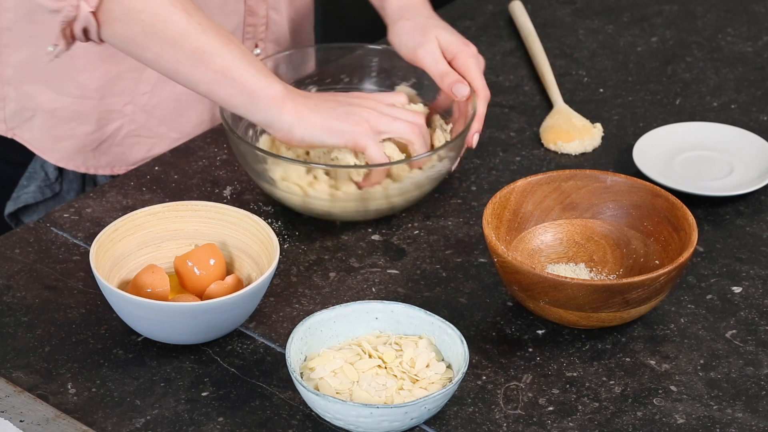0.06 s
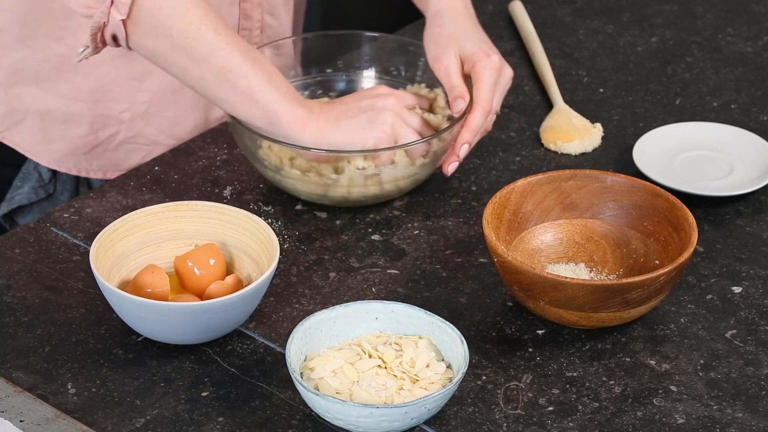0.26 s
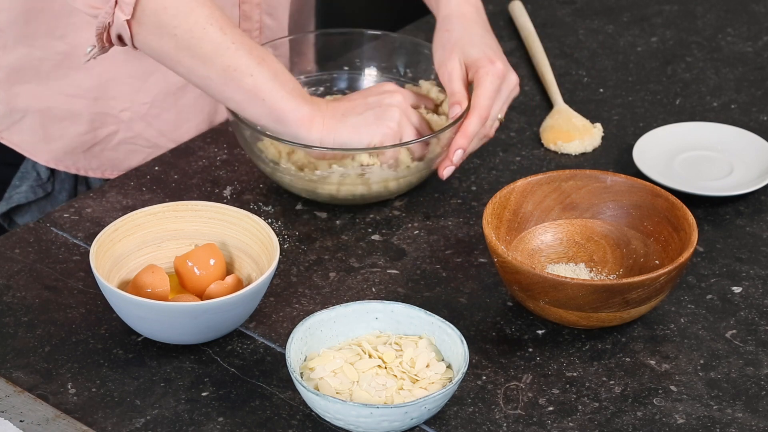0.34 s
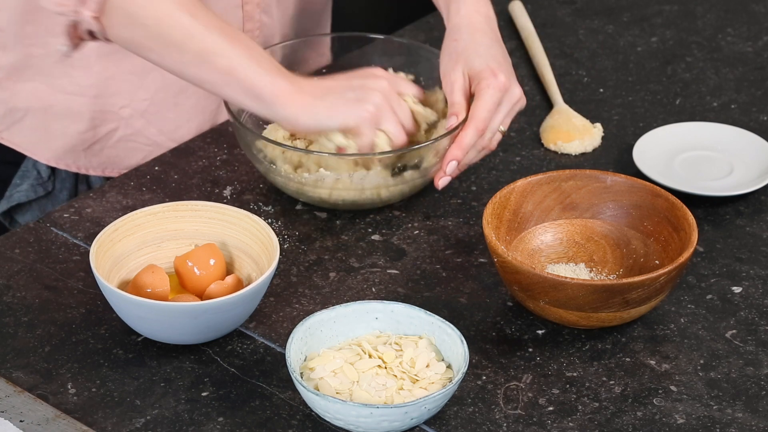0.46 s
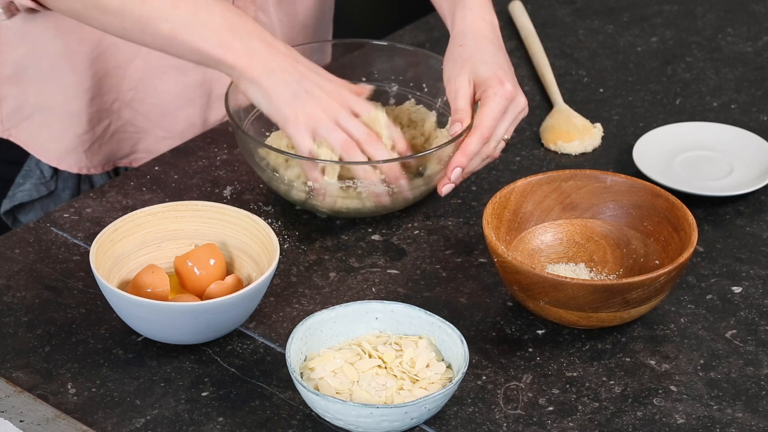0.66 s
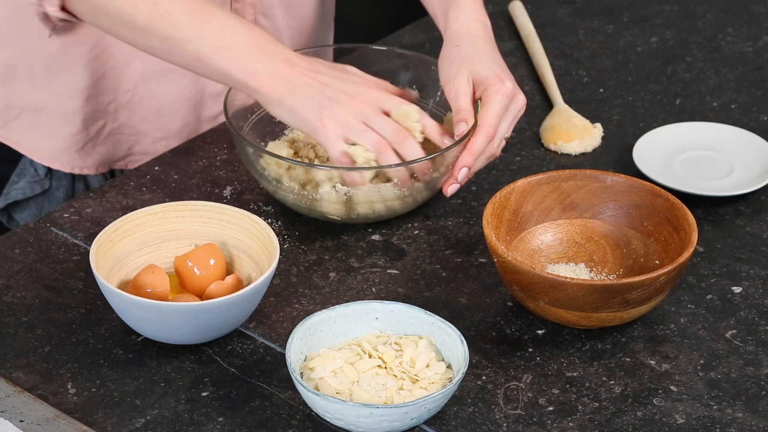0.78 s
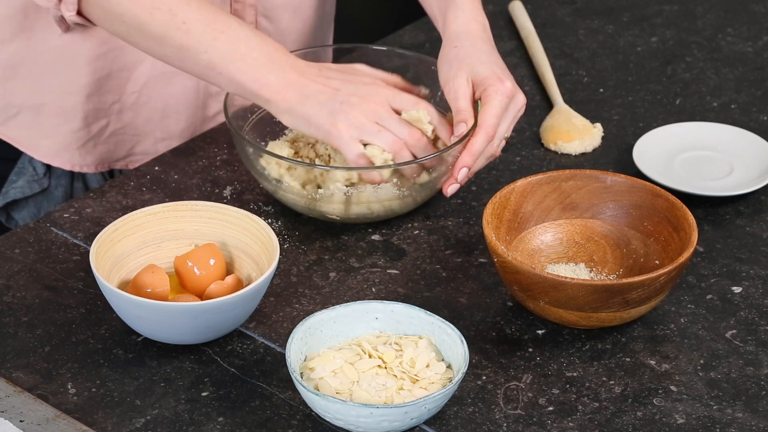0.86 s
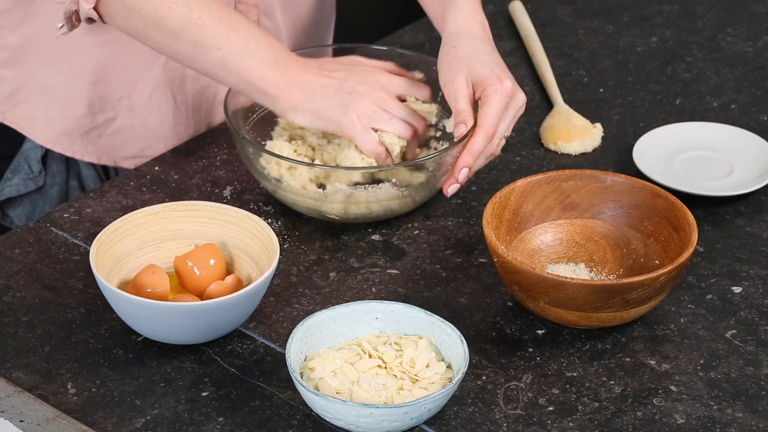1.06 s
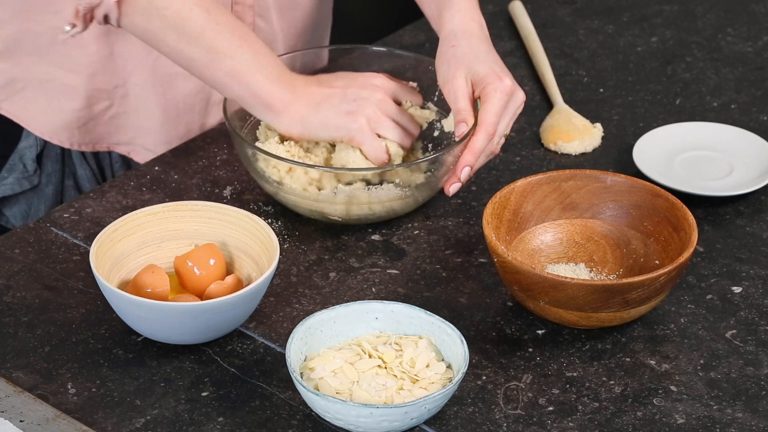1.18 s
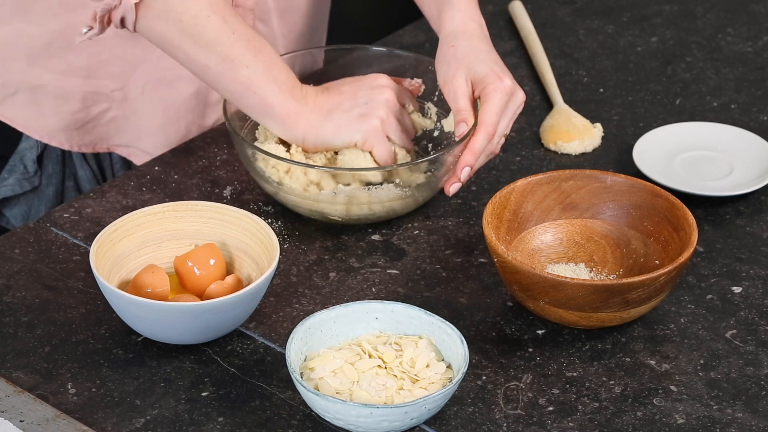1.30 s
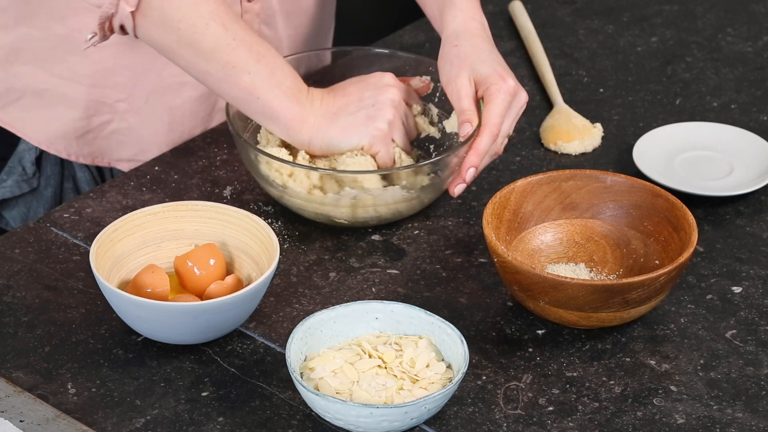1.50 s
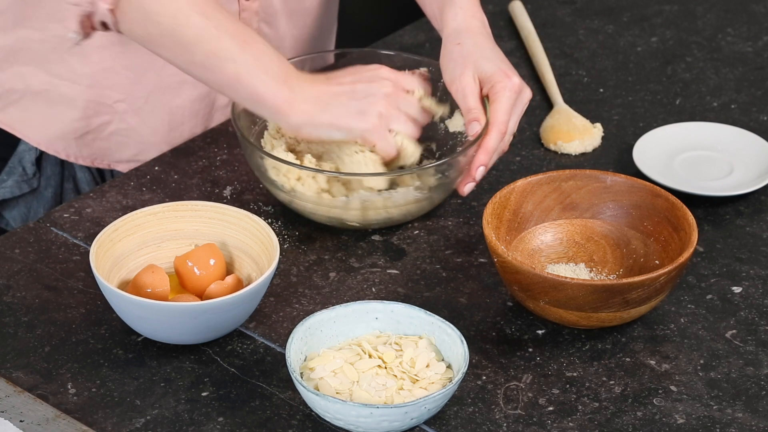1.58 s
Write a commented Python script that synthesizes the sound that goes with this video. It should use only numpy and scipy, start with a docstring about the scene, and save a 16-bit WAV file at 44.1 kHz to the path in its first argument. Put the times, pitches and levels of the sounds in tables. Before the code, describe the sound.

A glass bowl of dough scrapes on a stone counter, starting near 0.1 s: hollow, stuttering rubs with gritty glass and dry crumb rustle until about 0.75 s. A hard, clattering knock lands at 0.79 s, then a short scrape from 0.87 s and lighter knocks at 0.94, 1.06 and 1.13 s. Near quiet with faint rustles follows; scraping resumes around 1.6 s. Short kitchen echo, low hum, soft room noise.

```python
"""A low mains hum, then a glass bowl of dough scrapes and judders on a stone counter in a kitchen as hands knead.
Random slips excite the counter and the hollow under the foot, grit sets the glass singing, crumbs rustle.
The bowl tips, knocks down hard and rocks a few times: clicks ring counter and glass, and landings, from
hard slams to faint taps, are sines soon choked. Decaying noise gives the kitchen's echoes; room noise and
a low rumble lie below."""
import sys
import numpy as np
from scipy import signal
from scipy.fft import rfft, irfft
from scipy.io import wavfile

SR = 44100
rng = np.random.default_rng(int(sys.argv[2]) if len(sys.argv) > 2 else 0)


def store_pcm(level_fs):
    """Save levels as 16-bit WAV."""
    pcm = np.round(np.clip(level_fs, -1, 1) * 32767).astype(np.int16)
    wavfile.write(sys.argv[1], SR, np.atleast_2d(pcm).T)


def makeup_ratio(level_db):
    """Linear amplitude ratio for a level in decibels (20 dB per factor of ten)."""
    decades = np.asarray(level_db, float) / 20
    return 10 ** decades


N = 72765   # samples, 1.65 s

# modes of the bowl, damped by dough and hands; both levels are relative, before a weight by width:
# pitch_hz, width_hz, scraped_db, struck_db
GLASS_MODES = [(2406, 110, -31, 1), (2650, 28, -35, -11), (3047, 80, -24, -10), (3475, 60, -20, -5),
               (4610, 29, -28, -16), (5194, 14, -35, -14), (5510, 83, -3, -3), (5784, 160, -0.5, -1.5),
               (5860, 130, -9, -7), (7094, 110, -11.5, -14), (7240, 43, -7, -26), (7740, 72, -5, 2),
               (8540, 124, -7.5, -7), (8080, 40, -4.5, -17), (9520, 300, -13, -13.5),
               (10570, 130, -11, -10.5), (12200, 190, -12, -12), (14120, 260, -17, -13),
               (15050, 100, -22.5, -32)]


def rms_one(x):
    """Scales x to rms 1."""
    return x / np.sqrt(np.mean(x ** 2) + 1e-20)


def in_time(tables):
    """Joins tables that start with a time in s and draws straight lines between their rows."""
    s, *columns = np.transpose(np.concatenate(tables))
    return [np.interp(np.arange(N) / SR, s, column) for column in columns]


def drift(rate_hz):
    """Slow random wander of rms 1, from noise through a double low-pass."""
    r = np.exp(-2 * np.pi * rate_hz / SR)
    noise = rng.standard_normal(N + SR)
    return rms_one(signal.lfilter([1], [1, -2 * r, r * r], noise)[SR:])   # drops the filter's first second


def grains(per_s, spread_db):
    """Random clicks of uneven size and either sign; rms 1."""
    sizes = makeup_ratio(spread_db * np.minimum(rng.exponential(1, N), 5)) * rng.choice([-1, 1], N)
    return rms_one(sizes * (rng.random(N) < per_s / SR))


def band(x, order, edges_hz):
    """Butterworth band-pass between two edges."""
    return signal.sosfilt(signal.butter(order, edges_hz, "band", fs=SR, output="sos"), x)


def poles(hz, width_hz):
    """Filter coefficients of one resonance; a wider one is damped faster."""
    r = np.exp(-np.pi * width_hz / SR)
    return (1 - r * r) / 2 * np.array([1, 0, -1]), [1, -2 * r * np.cos(2 * np.pi * hz / SR), r * r]


def resonance(x, hz, width_hz):
    """Two passes at one pitch, the first wider, leave dark valleys beside the peak; rms 1."""
    first = signal.lfilter(*poles(hz, 1.9 * width_hz), x)
    return rms_one(signal.lfilter(*poles(hz, width_hz), first))


def moving_resonance(x, hz, width_hz):
    """Two passes through a resonance whose pitch and width move, the second twice as wide; rms 1."""
    step = 128   # samples between coefficient updates
    for widen in (1, 2):
        state, moved = np.zeros(2), np.zeros(N)
        for i in range(0, N, step):
            coefficients = poles(hz[i], widen * width_hz[i])
            moved[i:i + step], state = signal.lfilter(*coefficients, x[i:i + step], zi=state)
        x = moved / width_hz ** .25   # offsets part of the gain of wide settings on noise
    return rms_one(x)


def ring(clicks, hz, t60_s):
    """A unit click sets a decaying sine ringing from height 1."""
    r, w = makeup_ratio(-60 / (t60_s * SR)), 2 * np.pi * hz / SR
    return signal.lfilter([0, np.sin(w)], [1, -2 * r * np.cos(w), r * r], clicks + 1e-18)


def counter_thrum():
    """Slips of the foot drive fixed counter modes and one main mode that moves as the weight shifts."""
    # counter modes under the foot, level against the main thrum: pitch_hz, width_hz, level_db
    counter_modes = [(602, 267, -7), (384, 225, -19), (1080, 33, -9.5), (1520, 50, -16.5),
                     (1850, 18, -38.5)]
    # weight shifting on the foot: time_s, main_thrum_hz, hollow_width_hz
    weight_shift = [
        [(.09, 797, 130), (.12, 770, 417), (.16, 625, 463), (.21, 668, 417), (.29, 690, 230), (.44, 630, 218),
         (.53, 575, 196), (.575, 750, 216), (.66, 656, 230), (.7, 796, 230), (.9, 677, 225), (1.55, 722, 380)],
    ]
    slips = grains(2500, 1.0)
    thrum_hz, hollow_width_hz = in_time(weight_shift)
    thrum = moving_resonance(slips, thrum_hz, np.full(N, 150))   # width 150 Hz
    for hz, width_hz, level_db in counter_modes:
        thrum = thrum + makeup_ratio(level_db) * resonance(slips, hz, width_hz)
    lumps_db, lumps_hz = 2, 22   # the level wanders
    return thrum * makeup_ratio(lumps_db * drift(lumps_hz)), hollow_width_hz


def hollow_under_foot(pitch_hz, width_hz):
    """Slips drive the hollow under the foot, a moving resonance with a broad skirt above it."""
    # skirt against the moving resonance: pitch_hz, width_hz, level_db
    hollow_skirt = [(2180, 2900, -19.5)]
    slips = grains(2500, 2.7)
    skirt = sum(makeup_ratio(db) * resonance(slips, hz, width) for hz, width, db in hollow_skirt)
    return moving_resonance(slips, pitch_hz, width_hz) + skirt


def gritty_glass(fine_db):
    """Grit clicks drive the glass modes; fine_db tilts those above 5700 Hz by so much an octave."""
    grit = grains(4500, 2.2)
    wander_db, wander_hz = 3, 8   # each mode's level wanders
    glass = np.zeros(N)
    for hz, width_hz, scraped_db, _ in GLASS_MODES:
        level_db = scraped_db + fine_db * np.log2(max(hz / 5700, 1)) + wander_db * drift(wander_hz)
        glass += makeup_ratio(level_db) * resonance(grit, hz, width_hz) * np.sqrt(width_hz / 140)
    return glass


def singing_wall():
    """The grip frees or damps one thin mode of the bowl wall, heard as narrow noise."""
    # time_s, level_db
    wall_level = [
        [(.2, -85), (.27, -68), (.39, -69), (.43, -80), (.49, -61), (.63, -58), (.67, -70), (.76, -88)],
    ]
    return makeup_ratio(in_time(wall_level)[0]) * resonance(rng.standard_normal(N), 3480, 65)   # pitch, width in Hz


def drag():
    """The dragging foot slips on the stone: counter, hollow, gritty glass and singing wall together."""
    # the foot's drag: time_s, thrum_db, hollow_db, hollow_pitch_hz, grit_db, grit_fineness_db_per_octave
    foot_drag = [
        [(0, -56, -73, 1080, -73, 17), (.065, -58, -50, 1040, -93, 7), (.09, -45, -42, 1000, -66, 4),
         (.15, -48, -41, 1190, -50.5, 5), (.2, -37, -39.5, 1180, -57, 12), (.26, -43, -44.5, 1360, -58.5, 7.5),
         (.32, -39, -40, 1470, -56, 6), (.41, -46, -43, 1283, -58.5, 5), (.46, -41.5, -39.5, 1226, -61.5, 2.5),
         (.53, -42, -35.5, 1076, -57, 3.5), (.61, -37.5, -41.5, 1030, -50.5, 0),
         (.635, -39, -35, 1040, -44, -18), (.65, -42.5, -38.5, 1020, -60.5, -0.5),
         (.7, -47, -41, 1070, -62.5, 2), (.775, -42.5, -43, 1160, -65, 9.5)],
        [(.87, -39.5, -38.5, 1200, -57.5, -3), (.98, -46.5, -41.5, 1200, -73, -19),
         (1.03, -59, -45.5, 1130, -87, 1), (1.12, -50.5, -55, 1170, -96, 2), (1.16, -45.5, -72, 1080, -70, 11),
         (1.22, -49, -53.5, 1080, -71, 8), (1.28, -59, -49, 1130, -71, 5), (1.325, -64, -73, 1080, -80, 1),
         (1.515, -76, -64, 935, -71.5, 5), (1.56, -54, -52.5, 1180, -66, -6), (1.61, -43, -46.5, 1010, -65, -3),
         (1.65, -40.5, -42, 990, -53.5, 3)],
    ]
    thrum_db, hollow_db, hollow_hz, grit_db, fine_db = in_time(foot_drag)
    thrum, hollow_width_hz = counter_thrum()
    hollow = hollow_under_foot(hollow_hz, hollow_width_hz)
    scrape = makeup_ratio(thrum_db) * thrum + makeup_ratio(hollow_db) * hollow
    return scrape + makeup_ratio(grit_db) * gritty_glass(fine_db) + singing_wall()


def judders():
    """The foot catches and lets go: each time a sine swells and fades within a few cycles."""
    # start_s, peak_db of the swell, pitch_hz
    catches = [(0.086, -32, 1035), (0.138, -32, 642), (0.138, -31, 1440), (0.173, -40, 346),
               (0.201, -23, 747), (0.232, -38.5, 430), (0.234, -32.5, 1426), (0.358, -29, 1260),
               (.404, -30.5, 1373), (0.234, -23, 710), (0.29, -29.5, 623), (0.317, -28.5, 650),
               (0.359, -22.5, 596), (0.396, -23.5, 688), (0.485, -26, 1208), (0.529, -27, 1070),
               (.562, -38, 394), (0.609, -27, 914), (0.633, -18.5, 716), (0.979, -31, 647),
               (1.568, -41.5, 794), (1.635, -29, 800)]
    rise_s, fall_s = 0.00088, 0.0035
    out, t = np.zeros(N + SR), np.arange(SR // 20) / SR
    rise = (t / rise_s) ** 2 / (1 + (t / rise_s) ** 2)
    swell = rise * np.exp(-(t / (2 * fall_s)) ** 2)
    swell /= swell.max()
    for start_s, peak_db, hz in catches:
        i = int(start_s * SR)
        out[i:i + len(t)] += makeup_ratio(peak_db) * swell * np.sin(2 * np.pi * (hz * t + rng.random()))
    return out[:N]


def knocks():
    """The foot strikes the stone: clicks ring clack, thud, slab and glass, and a noise burst crushes grit."""
    # knock times: start_s
    knock_times = [.7874, .79535, .7980, .9404, 1.0577, 1.1340]
    # one row a knock: strike_db before filtering, glass_db and thud_db against it
    knock_levels = [(-15, -23, 6.5), (-20, -2, -33), (-21, -2, -26), (-17.5, -42, -11), (-23, -34, 1),
                    (-20.5, -38, 5)]
    # clack and thud modes, relative level: pitch_hz, level_db, t60_s
    clack_modes = [(1150, -3, .03), (1340, -7, .024), (1500, -8, .026)]
    thud_modes = [(667, -10.5, 0.037), (844, -15, 0.017), (517, -20, 0.07)]
    # the heavy slab shaking, relative level before its resonance: pitch_hz, level_db, t60_s
    slab_modes = [(33, -27, 0.078), (300, -24.5, 0.14)]
    start_s = np.array(knock_times)
    strike_db, glass_db, thud_db = np.transpose(knock_levels)

    def blows(level_db):
        """One downward click a knock."""
        clicks = np.zeros(N)
        clicks[(start_s * SR).astype(int)] = -makeup_ratio(level_db)
        return clicks

    contact = sum(ring(blows(strike_db + db), hz, t60_s) for hz, db, t60_s in clack_modes)
    for k, (hz, db, t60_s) in enumerate(thud_modes):
        contact = contact + ring(blows(strike_db + thud_db + db), hz, t60_s) * (-1) ** k
    out = band(contact, 4, [470, 1730])   # soft contact dulls the blow

    for hz, db, t60_s in slab_modes:
        shake = ring(blows(strike_db + db), hz, t60_s)
        out = out + signal.lfilter(*poles(hz, hz), shake)   # a heavy slab builds up over a cycle

    crack_db, crack_t60_s = -1.5, 0.0059   # level beside the glass, before the band-pass
    crack_decay = makeup_ratio(-60 / (crack_t60_s * SR))
    burst = signal.lfilter([1], [1, -crack_decay], blows(strike_db + glass_db + crack_db))
    out = out + band(burst * rng.standard_normal(N), 2, [1730, 5400])

    for k, (hz, width_hz, _, struck_db) in enumerate(GLASS_MODES):
        uneven_db = rng.normal(0, 0.98, len(start_s))
        t60_s = np.log(1000) / np.pi / width_hz   # a wide mode dies fast
        mode = ring(blows(strike_db + glass_db + struck_db + uneven_db), hz, t60_s)
        out = out + mode * np.sqrt(width_hz / 140) * (-1) ** k
    return out


def landings():
    """Landings, from hard slams to faint taps, ring briefly until the foot seats and chokes them."""
    # start_s, start_db before the band-pass, free_s, pitch_hz
    touchdowns = [(.7876, -5, .0012, 900), (.7954, -4.5, .0036, 1195), (.79985, -2.5, .0034, 1200),
                  (1.1344, -19, .0012, 1050), (1.4172, -36, .0012, 800)]
    t60_s, choke_s, choked_share = .05, .0004, .2   # the choke leaves a fifth of the ring
    out, t = np.zeros(N), np.arange(SR // 20) / SR
    for start_s, start_db, free_s, hz in touchdowns:
        choke = np.maximum(np.exp(-np.maximum(t - free_s, 0) / choke_s), choked_share)
        shape = makeup_ratio(start_db - 60 * t / t60_s) * choke
        i = int(start_s * SR)
        out[i:i + len(t)] -= shape * np.sin(2 * np.pi * hz * t)
    return band(out, 3, [300, 2100])


def rustle():
    """Crumbs shear and spill between the fingers: swells of dense dry grains, each with its brightness."""
    # middle_s, spread_s, level_db, middle_hz
    spills = [(0.154, 0.057, -51, 8050), (0.226, 0.0027, -50, 8050), (0.331, 0.019, -50.5, 8100),
              (0.43, 0.045, -59, 9100), (0.485, 0.0086, -62, 11000), (0.615, 0.018, -56, 10000),
              (0.678, 0.016, -51, 10500), (0.932, 0.0052, -57, 8800), (1.022, 0.0057, -60, 9850),
              (1.339, 0.0033, -60, 10100), (1.42, 0.013, -62, 11000), (1.473, 0.01, -57.5, 12500),
              (1.522, 0.015, -57.5, 11200), (1.57, 0.019, -55.5, 12000), (1.61, .01, -61, 12000)]
    spread_octaves = 0.52
    crumbs = rfft(grains(6100, 4.4))
    t, hz = np.arange(N) / SR, np.fft.rfftfreq(N, 1 / SR) + 1
    out = np.zeros(N)
    for middle_s, spread_s, level_db, middle_hz in spills:
        swell = np.exp(-.5 * ((t - middle_s) / spread_s) ** 2)
        colour = np.exp(-.5 * (np.log2(hz / middle_hz) / spread_octaves) ** 2)
        out += makeup_ratio(level_db) * swell * rms_one(irfft(crumbs * colour, N))
    return out


def kitchen(x):
    """The kitchen's dense echoes: noise in half-octave bands, each dying at its own rate."""
    # pitch_hz, t60_s, relative level_db
    room_decay = [(150, 0.18, -7.5), (707, 0.42, 2), (1200, 0.35, -6.5), (2500, 0.62, -2),
                  (4600, 0.31, -1.5), (6400, 0.31, -9.5), (12000, 0.3, -1.5)]
    first_echo_s = 0.0046   # about 1.6 m of extra path
    t, edges_hz = np.arange(SR) / SR, 60 * 2. ** np.arange(0, 8.6, .5)
    hz, t60_s, level_db = np.transpose(room_decay)
    echoes = np.zeros(SR)
    for low, high in zip(edges_hz, edges_hz[1:]):
        middle = np.log(low * high) / 2
        band_db = np.interp(middle, np.log(hz), level_db)
        band_t60_s = np.interp(middle, np.log(hz), t60_s)
        echoes += band(rng.standard_normal(SR), 2, [low, high]) * makeup_ratio(band_db - 60 * t / band_t60_s)
    echoes = echoes * (t > first_echo_s)
    return signal.fftconvolve(x, rms_one(echoes) / np.sqrt(SR))[:N]   # echoes of unit energy


def mains_hum():
    """A sine that wavers a little in level and phase."""
    hum_hz, hum_db, waver_db, waver_cycles = 99.9, -48.5, .6, .015
    cycles = hum_hz * np.arange(N) / SR + waver_cycles * drift(2.3) + rng.random()
    return makeup_ratio(hum_db + waver_db * drift(8.5)) * np.sqrt(2) * np.sin(2 * np.pi * cycles)


def room_noise():
    """Noise shaped to the room's spectrum, with a low rumble."""
    # pitch_hz, relative level_db per Hz
    air_spectrum = [(76, -50), (130, -0.5), (153, -8.5), (416, -7), (561, -10.5), (945, -15.5), (2420, -26),
                    (7000, -30), (15600, -31)]
    points_hz, points_db = np.transpose(air_spectrum)
    hz = np.fft.rfftfreq(N, 1 / SR) + 1
    colour = makeup_ratio(np.interp(np.log(hz), np.log(points_hz), points_db))
    air = rms_one(irfft(rfft(rng.standard_normal(N)) * colour, N))
    rumble = resonance(rng.standard_normal(N), 45, 60)   # pitch, width in Hz
    return makeup_ratio(-52) * air + makeup_ratio(-65) * rumble


def scene():
    """The bowl on its counter, the kitchen's echoes of it and the background, in mono."""
    bowl = drag() + judders() + knocks() + landings() + rustle()
    room_db = -8.5
    return (bowl + makeup_ratio(room_db) * kitchen(bowl) + mains_hum() + room_noise())[None]


def roll_off(x):
    """The treble ends steeply here."""
    return signal.sosfilt(signal.butter(12, 15760, fs=SR, output="sos"), x)


def record(dry):
    """Delivers the finished mix."""
    return roll_off(dry)


dry = scene()
out = record(dry)
store_pcm(out)
```